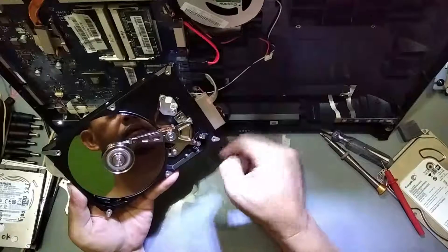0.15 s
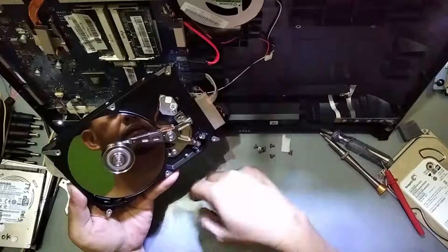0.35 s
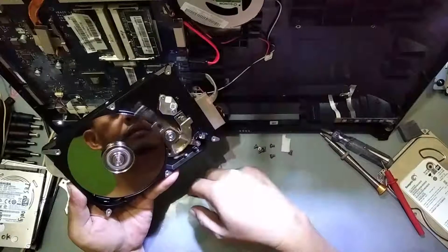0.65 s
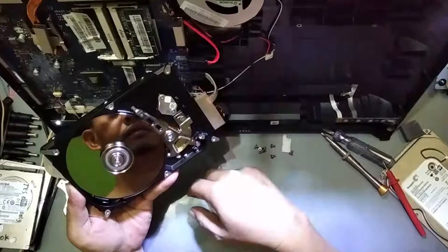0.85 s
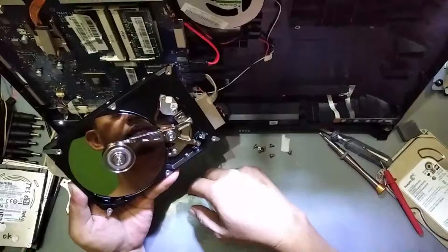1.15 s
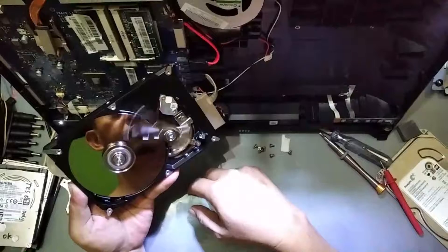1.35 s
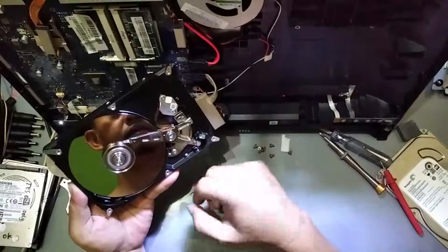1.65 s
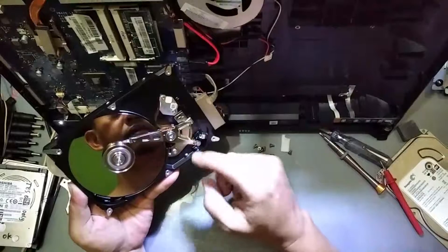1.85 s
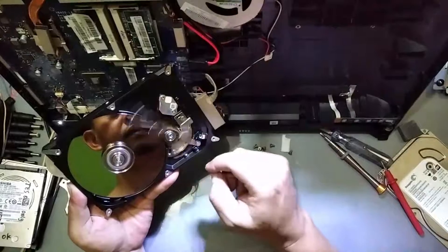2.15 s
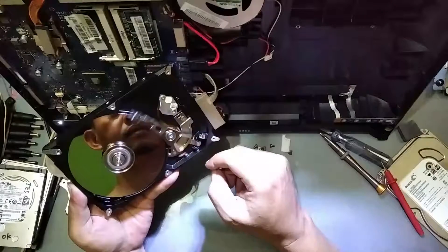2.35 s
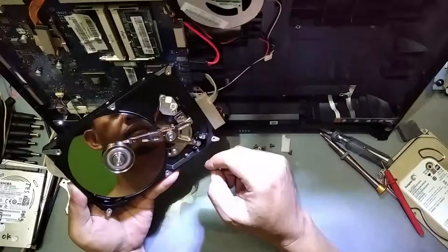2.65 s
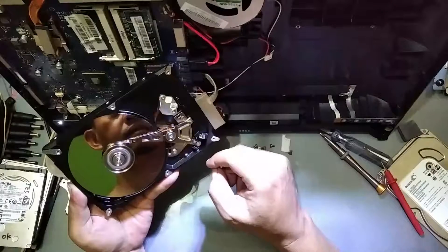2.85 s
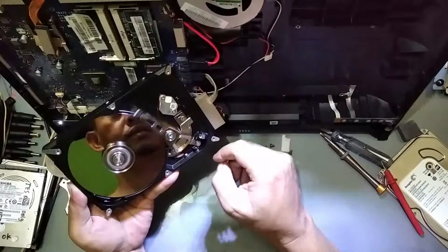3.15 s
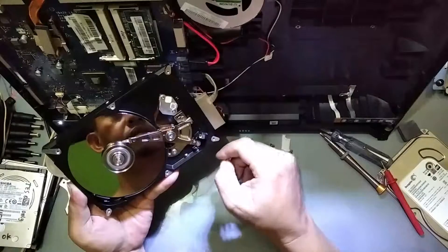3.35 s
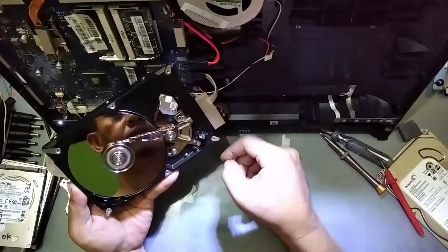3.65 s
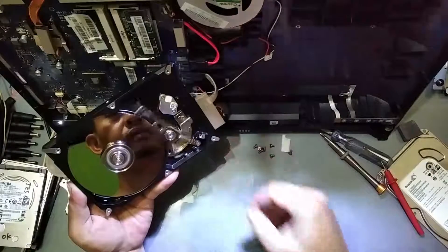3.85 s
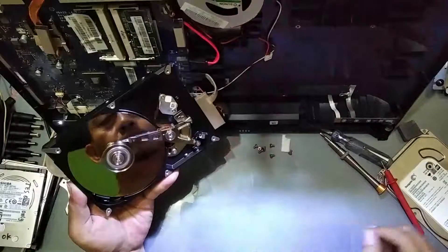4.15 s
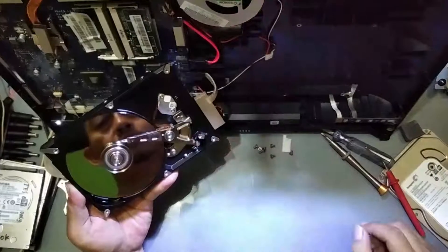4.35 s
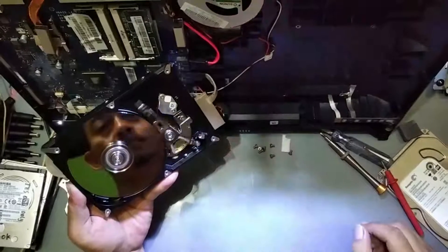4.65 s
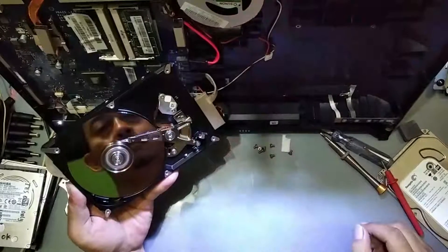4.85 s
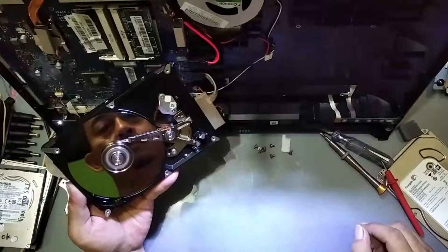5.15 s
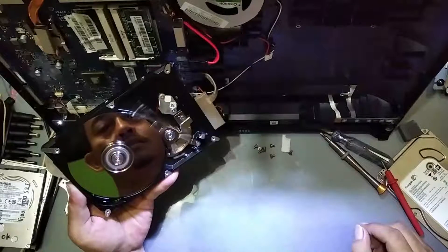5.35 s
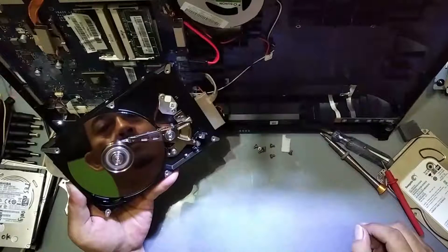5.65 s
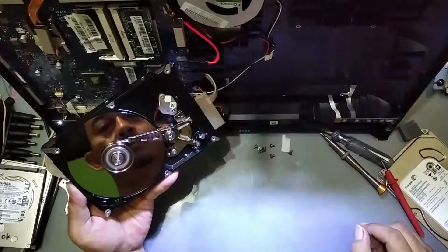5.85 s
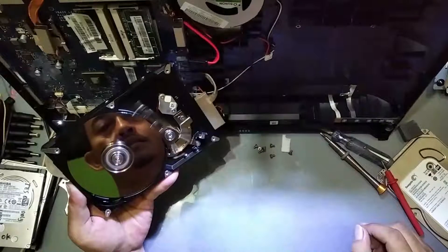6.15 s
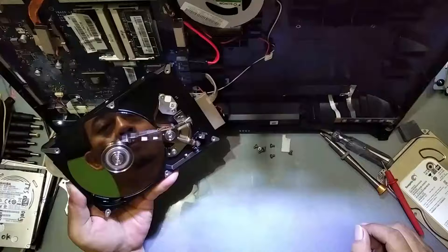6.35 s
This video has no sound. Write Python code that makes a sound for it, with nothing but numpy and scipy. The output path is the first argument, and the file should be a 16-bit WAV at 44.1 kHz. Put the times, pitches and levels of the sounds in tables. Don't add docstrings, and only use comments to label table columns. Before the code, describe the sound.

A bright, hard metallic clack opens the sound immediately: the arm of an opened hard drive hitting its stop, overloading a close stereo microphone. It rattles, rebounds after a few hundredths of a second, then clicks back at 0.17 with tiny fading bounces. Soft hand contact thuds on the bench near 0.5. Further slams come at about 0.76, 1.55, 2.35, 3.13, 3.91, 4.69, 5.49 and 6.28, nearly regular. The second is followed by two small dry ticks around 1.15; the others have return clicks some 0.13 to 0.17 later, firmer near 2.5, 3.3, 5.65 and 6.43. The slams at 1.55 and 4.69 lack the quick rebound. A slightly stronger dull hand thud falls at 3.86. Throughout, the platter's steady airy whir, fluttering casing resonance and very faint rumble persist, ducking after each slam and creeping back. A short workshop reverberation trails the hits.

```python
import sys
import numpy as np
from scipy import signal
from scipy.fft import rfft, irfft, next_fast_len
from scipy.io import wavfile
from scipy.ndimage import uniform_filter1d, map_coordinates

SR = 44100
rng = np.random.default_rng(int(sys.argv[2]) if len(sys.argv) > 2 else 0)


def int16_out(signal):
    q = np.round(np.clip(np.atleast_2d(signal).T, -1, 1) * 32767)
    wavfile.write(sys.argv[1], SR, q.astype(np.int16))


def volts(x):
    e = np.asarray(x, float) / 20
    return 10 ** e


N = 286650

# start in seconds, peak in dB, knock of the base in dB,
# rebound in dB (None if the arm sticks).
SLAMS = [
    (0.0054, 1, 4, 4.5),
    (0.7641, 0.5, 3.5, 6.5),
    (1.547, 1, 5.5, None),
    (2.3458, 1, 5.5, 4.5),
    (3.1295, 0, 2, 4.5),
    (3.911, 1, 1, 2),
    (4.694, 1, 3, None),
    (5.493, 0, 4, 7),
    (6.2764, -1, 6.5, 7),
]
# start in seconds, peak in dB, slap in dB.
THUDS = [
    (0.4818, -35, -4.5),
    (0.488, -45, 8.5),
    (0.502, -37.5, -3),
    (3.855, -30.5, -9),
    (3.869, -34.5, -5),
]
# start in seconds, peak in dB.
RETURNS = [
    (0.166, -2),
    (1.6757, -1.5),
    (2.504, 2.5),
    (3.2879, 3.5),
    (4.075, -3.5),
    (4.8243, -4),
    (5.6508, 3),
    (6.4345, 3),
]
# start in seconds, peak in dB, brightness in dB per octave.
SETTLES = [
    (0.2378, -14, -5),
    (0.3074, -22.5, -13),
    (1.7265, -14, -6),
    (2.5561, -20, -3),
    (3.342, -16.5, -3),
    (4.151, -19.5, 7),
    (4.222, -24, -9),
    (4.8907, -15.5, -7),
    (5.6947, -20.5, 10),
]
# start in seconds, peak in dB, t60 in seconds.
RAMP = [
    (1.1412, -14, 0.0093),
    (1.1679, -3.5, 0.0092),
]
# frequency in Hz, level in dB, left minus right in dB, left lead in rad.
RAMP_MODES = [(5830, 1.5, -4, 1), (6800, -1, -8, -2.1), (8400, -10, 2, 0.39), (9000, -1, 2, -0.43),
              (10800, -7, -1, -1.5), (13300, -15, .1, 0.26)]
# frequency in Hz, level in dB, t60 in seconds,
# left minus right in dB, left lead in rad.
TICK = [(4056, -11, 0.014, -1, 1.8), (4310, -18.5, 0.014, -20, -11.5), (5407, -7.5, 0.01, -19.5, 2.27),
        (6090, -9, 0.012, -14, 12), (6737, -3.5, 0.021, -9.5, -2), (7400, -41, 0.04, -20, -3),
        (8850, 1, 0.012, -15, -2.4), (9137, 3, 0.0096, 7, -0.93), (10600, -20.5, 0.01, 25, -14.5),
        (11630, -22, 0.022, -12.5, 4), (12420, -14, 0.0067, 1.5, -2)]
FRAME = [(1740, -25, 0.095, -5.5, 2.12), (2720, -40, 0.15, -16, -5), (3114, -27.5, 0.22, 6, 2),
         (4026, -27.5, 0.22, -13, 1.8)]
# frequency in Hz, width in Hz, level in dB.
ARM = [(1752, 77, -11.5), (2627, 225, -22.5), (3122, 19, -3.5), (3460, 95, -14.5), (4077, 210, -5.5),
       (4200, 420, -15.5), (5280, 320, -4), (5630, 350, -8), (6465, 254, -3), (6590, 240, -9.5),
       (7140, 50, -4.5), (8160, 120, -7), (8950, 200, -3.5), (9230, 270, -11), (10760, 2600, -21),
       (11350, 110, -31)]
# frequency in Hz, level in dB per Hz.
ARM_BODY = [(1940, -66), (3300, -20), (3970, 8), (4860, 3), (5340, 6.5), (7570, 1.5), (9150, 3),
            (14000, -29), (14700, -39), (15000, -86)]
# frequency in Hz, width in Hz, depth from 0 to 1.
DIPS = [(3380, 120, .7), (4900, 130, .75), (12450, 450, .8)]
# frequency in Hz, width in Hz, level in dB.
BENCH = [(109, 9.2, 8), (322, 76, 0), (535, 210, -3), (890, 140, 2)]
# frequency in Hz, width in Hz, level in dB.
CASING = [(1700, 148, -0.5), (3503, 267, 0.5), (7900, 810, -3), (9170, 600, -2.5)]
# frequency in Hz, level in dB per Hz.
AIR = [(290, -51), (500, -16), (1170, -14), (1750, -6), (2430, -11.5), (3510, -2.5), (4230, -7.5),
       (6390, -11.5), (8860, -12), (14200, -20.5), (15000, -42)]
# frequency in Hz, level in dB per Hz.
RUMBLE = [(15, -67), (25, -46), (114, -1), (248, -0.5), (284, -5), (310, -2), (340, -4.5), (472, -3),
          (583, -11.5), (900, -5), (1170, -47), (1980, -120)]
# frequency in Hz, level in dB rms.
HUM = [(114, -70), (313.7, -64.5), (365.9, -70), (480, -69)]
# frequency in Hz, likeness from 0 to 1.
ALIKE = [(60, 1), (130, 0.75), (290, 0.46), (640, 0.35), (1410, 0.41), (3100, 0.44), (6820, 0.034),
         (15000, 0.12)]
# frequency in Hz, t60 in seconds.
ROOM = [(300, 0.14), (3000, 0.86), (12000, 0.093)]
# frequency in Hz, left minus right in dB.
PORTS = [(60, 29.5), (99, 13), (160, 11.5), (270, 16), (450, 3.5), (740, -0.5), (1220, -0.5), (2010, -2),
         (3330, 0), (5500, -2), (9080, 3), (15000, 4)]

HISS_TOP_HZ = 14350
LEAD_S, LEAD_DB = .0062, -20
REBOUND_S = .0352
REBOUND_TILT_DB, RETURN_TILT_DB = -5.5, -8.5
REBOUND_FRAME_DB = -7
SNAP_DB = -16.5
CHATTER_DB, CHATTER_RISE_S, CHATTER_FADE_DB_PER_S, CHATTER_DIES_DB_PER_S2 = -6.5, 0.038, 107.5, 157
STIR_DB, STIR_GROWS, STIR_S = -23.5, .8, 0.021
PING_S = .147
PING_DB, PING_HZ, PING_T60_S = -29, 2163, 0.13
CASING_DB, AIR_DB, RUMBLE_DB = -42.5, -41, -55.5
ROOM_DB = -17


def unit(x):
    return x / np.sqrt(np.mean(x ** 2) + 1e-20)


def along(points, hz):
    f, v = np.transpose(points)
    return np.interp(np.log(hz + 1), np.log(f + 1), v)


def wobble(rate):
    knots = rng.standard_normal((2, int(N * rate / SR) + 4))
    return np.array([map_coordinates(k, [np.arange(N) * rate / SR]) for k in knots])


def filtered(x, response):
    m = next_fast_len(x.shape[-1] + 8192)
    spectrum = rfft(x, m) * response(np.fft.rfftfreq(m, 1 / SR))
    return irfft(spectrum, m)[..., :x.shape[-1]]


def resonances(modes):
    def response(f):
        total = 0
        for k, (hz, width, db) in enumerate(modes):
            total = total + (-1) ** k * volts(db) * 1j * f * width / (hz * hz - f * f + 1j * f * width)
        return total
    return response


def add(track, s, sound):
    part = track[:, max(round(s * SR), 0):][:, :sound.shape[1]]
    part += sound[:, :part.shape[1]]


def noise(t):
    return rng.standard_normal((2, len(t)))


def ring(modes, length, scatter_db, tilt_db=0, attack=0.00026):
    t = np.arange(round(length * SR)) / SR
    hz, db, t60, pan_db, lead = np.transpose(modes)[:, :, None]
    port = np.reshape([.5, -.5], (2, 1, 1))
    count = len(modes)
    tilt = tilt_db * np.log2(hz / 6000)
    size = volts(db + port * pan_db + tilt + scatter_db * rng.standard_normal((count, 1)))
    phase = port * lead + 0.39 * rng.standard_normal((count, 1)) + 0.29 * rng.standard_normal((2, count, 1))
    waves = size * volts(-60 * t / t60) * np.sin(2 * np.pi * hz * t + phase)
    return waves.sum(1) * (1 - np.exp(-t / attack))


def crack(t, t60):
    burst = noise(t) * volts(-60 * t / t60) * (1 - np.exp(-t / 0.00075))
    return filtered(burst, lambda f: volts(along(ARM_BODY, f)))


def bounces():
    rebounds = [(s + REBOUND_S, db, REBOUND_TILT_DB) for s, _, _, db in SLAMS if db is not None]
    returns = [(s, db, RETURN_TILT_DB) for s, db in RETURNS]
    return rebounds + returns + list(SETTLES)


def slams():
    out, t = np.zeros((2, N)), np.arange(SR // 20) / SR
    length = len(t) / SR
    shake_db = np.pad(3 * wobble(45)[0], (0, SR))
    u = t / .0001
    push = np.tile((1 - u / 1.63) * u * np.exp(-u), (2, 1))
    knock = filtered(push, lambda f: (1j * f / (650 + 1j * f)) ** 2)
    jolt = (1 - t / 0.0024) * np.exp(-t / 0.0011) * volts([[3], [-3]])
    for s, db, knock_db, _ in SLAMS:
        hit = ring(TICK, length, scatter_db=4.0) + 1.04 * crack(t, t60=0.028)
        frame = ring(FRAME, 0.5, scatter_db=1.5) * volts(shake_db[round(s * SR):][:SR // 2])
        brush = ring(TICK, length, scatter_db=5, attack=0.00064) + 1.1 * crack(t, t60=0.025)
        add(out, s + .0003, volts(db - 5.5) * hit)
        add(out, s, volts(db) * frame)
        add(out, s + 0.00055, volts(db + knock_db + 2.5) * knock)
        add(out, s, volts(db - 35) * jolt)
        add(out, s - LEAD_S, volts(LEAD_DB) * brush)
    return out


def bounce_ticks():
    out, t = np.zeros((2, N)), np.arange(SR // 20) / SR
    for s, db, tilt_db in bounces():
        tick = ring(TICK, len(t) / SR, scatter_db=1.5, tilt_db=tilt_db, attack=0.00013)
        snap = filtered(noise(t) * volts(-60 * t / .014), lambda f: 1 / (1 + 1j * f / 6000) ** 3)
        tick = tick + 0.7 * crack(t, t60=0.028) + volts(SNAP_DB) * snap
        add(out, s + 0.00037, volts(db - 5) * filtered(tick, lambda f: (1j * f / (1800 + 1j * f)) ** 2))
        add(out, s, volts(db + REBOUND_FRAME_DB) * ring(FRAME, 0.18, scatter_db=3.5, attack=0.00033))
    return out


def chatter():
    power = np.zeros((1, N))
    u = np.arange(SR // 2) / SR
    fade = volts(CHATTER_DB - CHATTER_FADE_DB_PER_S * u - CHATTER_DIES_DB_PER_S2 * u ** 2)
    swell = (1 - np.exp(-u / CHATTER_RISE_S)) * fade
    stir = u / STIR_S * np.exp(-u / STIR_S)
    for s, *_ in SLAMS:
        add(power, s - LEAD_S, swell[None] ** 2)
    for s, db, _ in bounces():
        add(power, s, volts(STIR_DB + STIR_GROWS * db) ** 2 * stir[None])

    rattle = 0
    for part in (ARM[0::3], ARM[1::3], ARM[2::3]):
        struck = rng.random(N) < 2500 / SR
        sizes = struck * volts(3 * np.clip(rng.exponential(size=N), 0, 3))
        uneven = volts(1.4 * wobble(200)[0] + 0.68 * wobble(60)[0])
        impacts = (sizes + 0.25) * uneven * rng.standard_normal((2, N))

        def colour(f):
            body = resonances(part)(f) ** 0.97 + volts(-27.5 + along(ARM_BODY, f)) + volts(-39) * 1j
            return body * (f < HISS_TOP_HZ) / (1 + (1500 / (f + 1)) ** 6)
        rattle = rattle + filtered(unit(impacts), colour)

    def dips(f):
        return np.prod([1 - depth / (1 + ((f - hz) / width) ** 2) for hz, width, depth in DIPS], axis=0)
    return np.sqrt(power) * unit(filtered(rattle, dips))


def ramp():
    out, t = np.zeros((2, N)), np.arange(SR // 25) / SR

    def rush():
        return unit(filtered(noise(t), lambda f: resonances([(6300, 1500, 0), (8900, 2500, -1)])(f) ** 2))
    for s, db, t60 in RAMP:
        modes = [(hz, level, t60, pan, lead) for hz, level, pan, lead in RAMP_MODES]
        add(out, s, volts(db - 7.5) * ring(modes, .04, scatter_db=1.5))
        add(out, s, volts(db - 20) * rush() * volts(-60 * t / 0.0088))
    first_s, first_db, _ = RAMP[0]
    scrape = rush() * np.interp(t, [0, .009, .012, .022, .04], [.2, .3, 1, .2, 0])
    add(out, first_s - .012, volts(first_db - 10.5) * scrape)
    return out


def pings():
    out = np.zeros((2, N))
    mode = [(PING_HZ, 0, PING_T60_S, 0, 0)]
    for s, *_, rebound_db in SLAMS:
        if rebound_db is not None:
            add(out, s + PING_S, volts(PING_DB) * ring(mode, .048, scatter_db=1, attack=0.002))
    return out


def thuds():
    out, t = np.zeros((2, N)), np.arange(SR // 8) / SR
    for s, db, slap_db in THUDS:
        burst = rng.standard_normal(len(t)) + .5 * noise(t)
        blow = 3 * np.exp(-t / 0.00058) + burst * volts(-60 * t / 0.065)
        low = filtered(blow, resonances(BENCH))
        steps_db = 4 * rng.exponential(size=len(t) // 64 + 1).repeat(64)[:len(t)]
        grit = burst * volts(steps_db)
        slap = unit(filtered(grit, lambda f: f / (f + 200) / (1 + f / 2500) * (f < HISS_TOP_HZ)))
        slap = volts(slap_db) * slap * volts(-60 * t / 0.12)
        add(out, s, volts(db + 2.0) * (1.26 * low / np.abs(low).max() + slap))
    return out


def pair(response, likeness=1):
    def mid_side(f):
        turn = np.arccos(np.clip(likeness * along(ALIKE, f), -1, 1)) / 2
        return response(f) * (f < HISS_TOP_HZ) * [np.cos(turn), np.sin(turn)]
    mid, side = filtered(rng.standard_normal((2, N)), mid_side)
    return unit(np.array([mid + side, mid - side]))


def platter():
    casing_db = CASING_DB + 0.48 * wobble(40).mean(0) + 0.58 * wobble(11).mean(0)
    casing = volts(casing_db) * pair(lambda f: resonances(CASING)(f) ** 1.72)

    def air_colour(f):
        notch = 1 - .5 / (1 + ((f - 4900) / 150) ** 2)
        return volts(along(AIR, f)) * notch
    air = volts(AIR_DB + 1.94 * wobble(12).mean(0)) * pair(air_colour)

    rumble_db = RUMBLE_DB + 1.8 * wobble(2.1).mean(0) + 0.24 * wobble(17).mean(0)
    rumble = volts(rumble_db) * pair(lambda f: volts(along(RUMBLE, f)))

    t, hum = np.arange(N) / SR, 0
    for hz, db in HUM:
        level = volts(db + 3 + 1.2 * wobble(5)[0])
        hum = hum + level * np.sin(2 * np.pi * hz * t + .8 * wobble(3)[0])
    return casing + air + rumble + hum


def room(x):
    hz, t, z = signal.stft(rng.standard_normal((2, SR // 3)), SR, nperseg=256)
    tail = signal.istft(z * volts(-60 * t / along(ROOM, hz)[:, None]), SR, nperseg=256)[1]
    late = np.pad(x, ((0, 0), (130, 0)))
    return signal.fftconvolve(late, tail / np.linalg.norm(tail[0]), axes=1)[:, :N]


def scene():
    hits = slams() + bounce_ticks() + ramp() + pings() + thuds()
    return hits + volts(ROOM_DB) * room(hits) + chatter() + platter()


def thin(x, valley_db, faint_db):
    hz, _, z = signal.stft(x, SR, nperseg=2048)
    hz = hz[:-1, None]
    power = np.abs(z.mean(0)[:-1]) ** 2
    bands = np.repeat(power.reshape(-1, 8, power.shape[1]).mean(1), 8, axis=0)
    loudness = power.mean(0) / np.median(power.mean(0))
    around = uniform_filter1d(power, size=71, axis=0)
    valley = (hz > 1900) & (bands < volts(valley_db) ** 2 * around)
    usual = np.median(bands, axis=1, keepdims=True) * volts(faint_db + (hz - 13000) / 1100) ** 2
    faint = (hz > 10500) & (bands < usual * loudness ** .55)
    z[:, :-1] *= np.where(valley | faint, .02, 1)
    return signal.istft(z, SR, nperseg=2048)[1][:, :N]


def low_pass(x):
    return signal.sosfilt(signal.butter(12, 15640, fs=SR, output="sos"), x)


def record(dry):
    x = filtered(dry, lambda f: volts(np.outer([.5, -.5], along(PORTS, f))))
    t = np.arange(N) / SR
    since = np.array([t - row[0] - .004 for row in SLAMS])
    duck_db = (6.2 * np.exp(-np.clip(since, 0, None) / 0.3) * np.clip(since / 0.0013, 0, 1)).sum(0)
    keep = np.exp(-1 / (0.0025 * SR))
    over = signal.lfilter([1 - keep], [1, -keep], np.clip(np.abs(x).max(0) - .25, 0, None))
    x = np.clip(x * volts(-duck_db) / (1 + 0.36 * over), -1, 1)
    x = filtered(x, lambda f: 1 / (1 + (f / 14800) ** 24))
    return low_pass(x)


dry = scene()
out = record(dry)
int16_out(out)
```